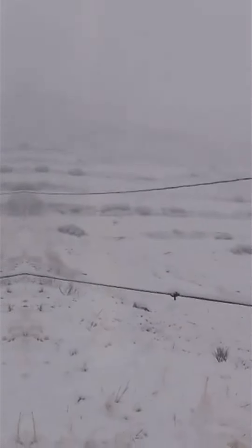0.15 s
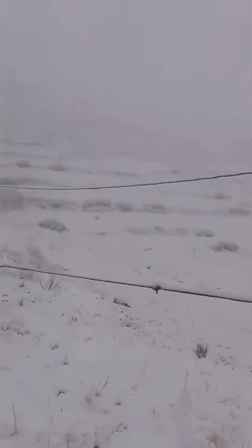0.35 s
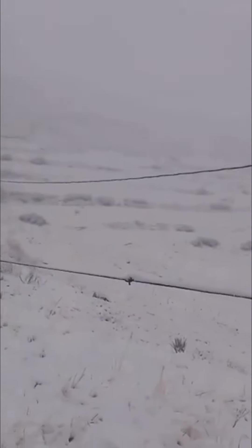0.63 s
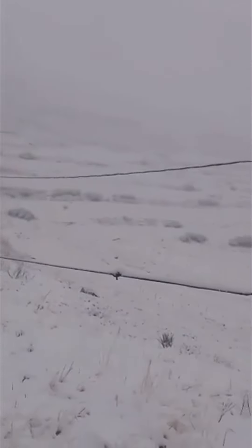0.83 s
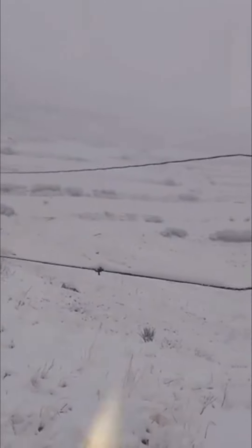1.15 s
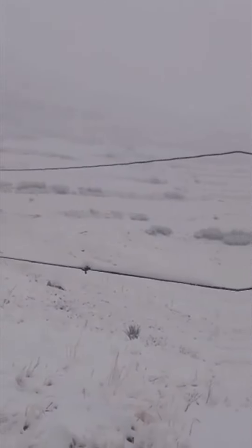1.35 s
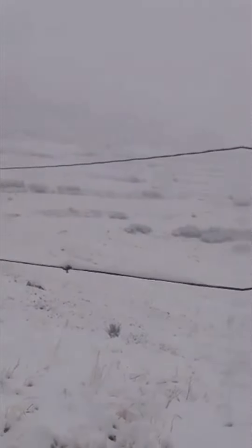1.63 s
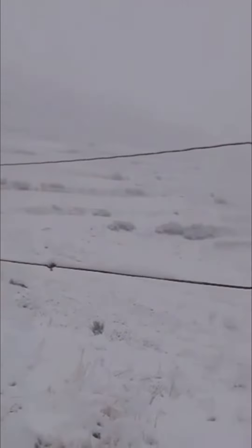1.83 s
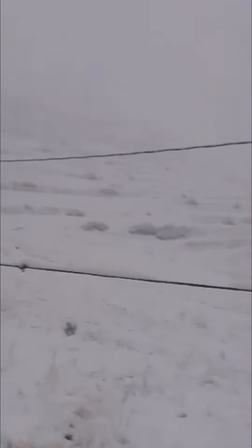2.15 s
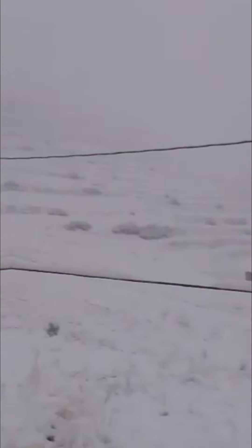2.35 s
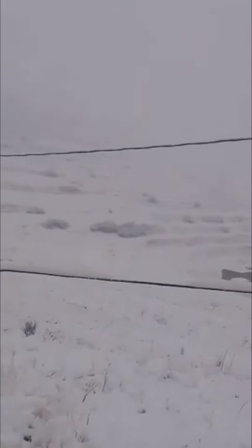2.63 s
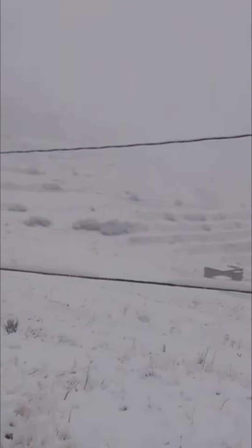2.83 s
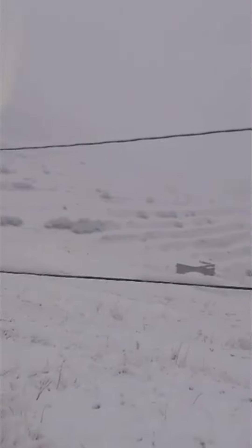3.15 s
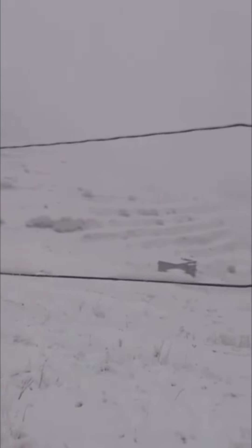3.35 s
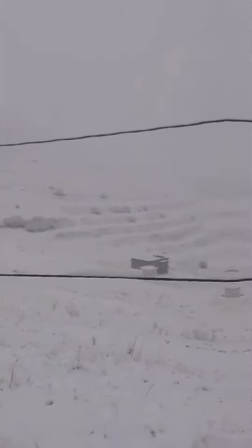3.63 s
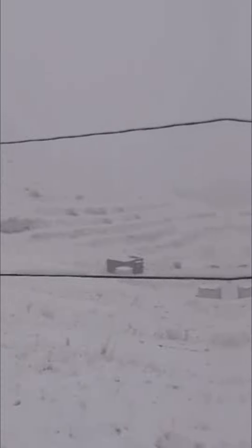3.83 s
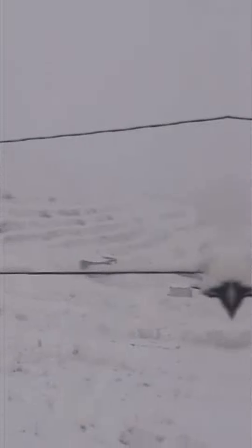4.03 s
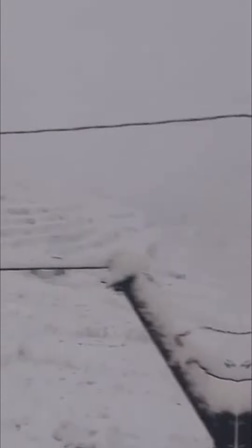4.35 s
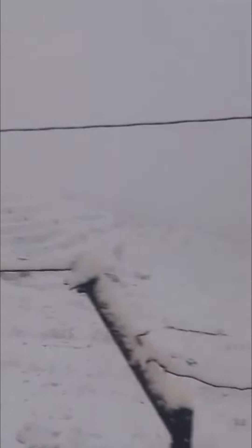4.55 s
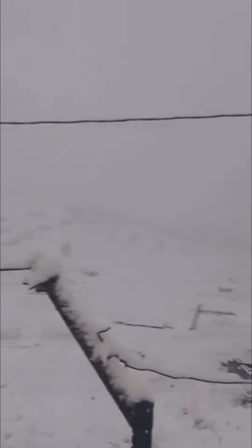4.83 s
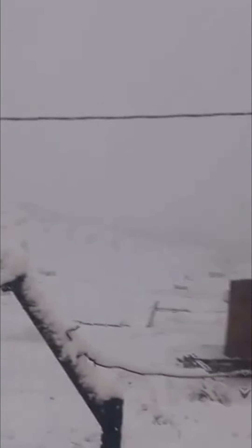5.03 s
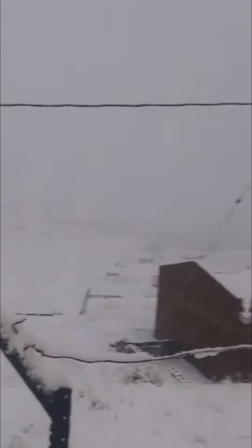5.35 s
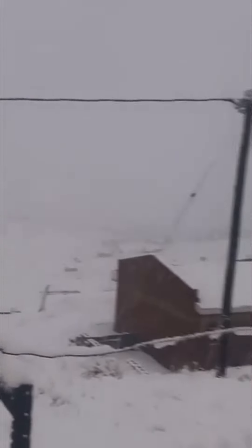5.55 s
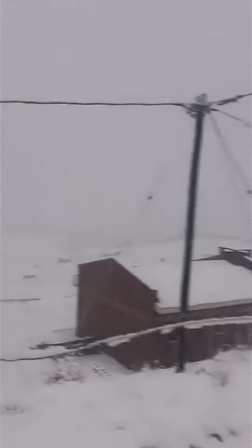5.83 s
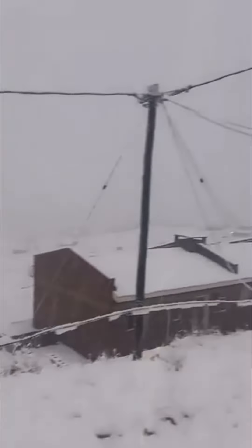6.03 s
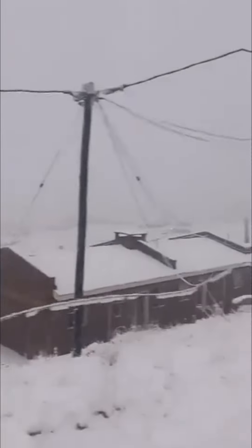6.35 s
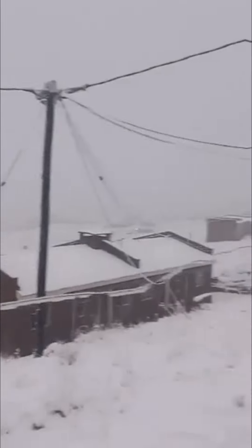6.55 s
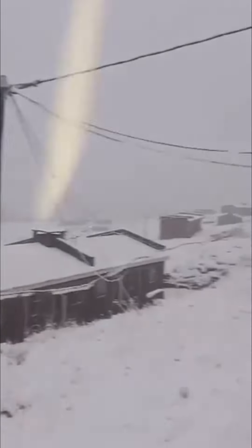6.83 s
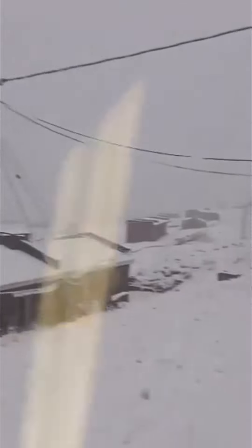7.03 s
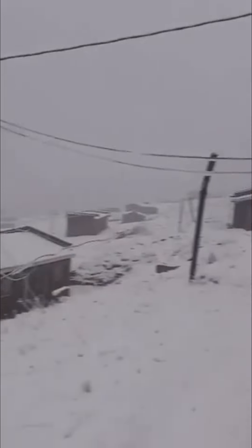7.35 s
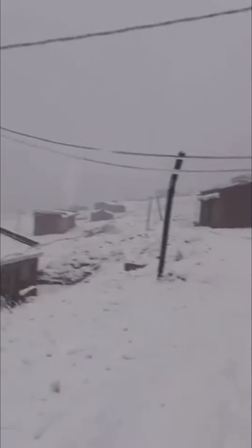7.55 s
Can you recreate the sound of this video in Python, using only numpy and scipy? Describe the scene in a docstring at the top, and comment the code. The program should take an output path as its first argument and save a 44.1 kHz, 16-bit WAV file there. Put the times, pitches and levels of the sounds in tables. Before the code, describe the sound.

Gusty wind buffets a phone microphone outdoors with a low, fluttering rumble, while a few light handling clicks sound.

```python
"""Gusty wind buffeting a hand-held phone above a snowy hillside.
Eddies strike the two microphone ports with rumble and flutter, and the largest heave far below hearing.
Behind them the open air rushes steadily, with a low roar, a hollow whistle and a smooth hiss.
The phone's case clicks now and then in the grip, and fingers brush it faintly.
A few faint, very high ticks sound on top."""
import sys
import numpy as np
from scipy import signal
from scipy.fft import rfft, irfft, next_fast_len
from scipy.io import wavfile
from scipy.ndimage import uniform_filter1d

SR = 44100
rng = np.random.default_rng(int(sys.argv[2]) if len(sys.argv) > 2 else 0)


def bounce(signal):
    """Save signal as a 16-bit WAV file at the path given by the first command-line argument."""
    frames = np.transpose(np.atleast_2d(signal))
    limited = np.clip(frames, -1, 1)
    pcm = np.round(limited * 32767).astype(np.int16)
    wavfile.write(sys.argv[1], SR, pcm)


N = 339433

# strength of the wind at the phone: t/s, level/dB
WIND_AT_PHONE = [(0, -41.5), (0.75, -40.5), (1.0, -38), (1.35, -33), (1.7, -34), (1.9, -33.5), (2.35, -32),
                 (2.8, -36.5), (3.2, -35.5), (3.48, -32.5), (3.62, -37.5), (3.72, -35.5), (3.88, -33.5),
                 (4.03, -38.5), (4.28, -39.5), (4.68, -38), (5.05, -38.5), (5.5, -35), (5.8, -38),
                 (6.05, -34), (6.5, -38), (7.1, -43.5), (7.7, -43)]


def buffeting(rumble_db=8.5, gust_db=10, flutter_db=-0.74, gust_flutter_db=-6, eddy_db=0.22, surge_db=0.3):
    """Eddies strike each port: rumble and flutter ride the wind, and sudden gusts add mostly rumble."""
    # sudden gusts that shove the ports: peak t/s, level/dB, half length/s
    shoves = [(0.69, -34, 0.087), (0.93, -32.5, 0.087), (1.13, -32.5, 0.042), (1.34, -30, 0.056),
              (1.53, -33.5, 0.064), (1.71, -30.5, 0.065), (2.05, -29, 0.093), (2.2, -32, 0.17),
              (2.78, -32, 0.061), (2.93, -32, .04), (3.49, -30, 0.051), (3.74, -26.5, 0.057),
              (3.86, -32, 0.052), (4.67, -34, 0.063), (4.78, -36, 0.036), (5.25, -44, .1),
              (5.66, -42.5, 0.08), (6.0, -32, 0.08), (6.38, -41, 0.034), (7.1, -57, .08),
              (7.37, -50, 0.026)]
    # deep rumble at the ports: f/Hz, level/dB
    rumble_eq = [(3, -13), (7, 9), (14, 5.5), (22, -2.5), (30, 0), (40, -7), (60, -9.5), (90, -32),
                 (200, -33.5)]
    # flutter above the rumble: f/Hz, level/dB
    flutter_eq = [(35, -19), (70, 1.5), (110, -2), (160, -1.5), (260, -3.5), (350, -14.5), (500, -18.5),
                  (900, -31), (2000, -69)]
    wind, gusts = undb(curves(WIND_AT_PHONE)[0]), swells(shoves)
    eddies = undb(eddy_db * np.array([walk(20), walk(20)]))
    rumble_gain = np.hypot(wind * undb(rumble_db + surge_db * walk(7)), gusts * undb(gust_db))
    flutter_gain = np.hypot(wind * undb(flutter_db), gusts * undb(gust_flutter_db))
    rumble = port_noise(rumble_eq, likeness=0.26) * rumble_gain
    flutter = port_noise(flutter_eq, likeness=0.75) * flutter_gain
    return (rumble + flutter) * eddies


def heave(sway_hz=4.1, wander=0.218, rest_db=-27):
    """The largest eddies wrap the whole phone and rock the pressure at both ports alike."""
    # large eddies: peak t/s, level/dB, half length/s
    large_eddies = [(2.43, -13.5, 0.31), (3.2, -6.5, 0.17), (3.47, -5.5, 0.22), (4.72, -21, 0.22),
                    (6.0, -19, 0.046), (6.33, -17, 0.043), (7.1, -23, 0.072)]
    hz = sway_hz * np.exp(wander * walk(3.5))
    sway = np.sqrt(2) * np.sin(2 * np.pi * np.cumsum(hz) / SR)
    return sway * np.hypot(undb(rest_db), swells(large_eddies))


def open_air(roar_db=-41.5, rush_db=-47.0, hiss_db=-55.5, roar_growth=0.54, hiss_growth=1.46):
    """Wind further off: roar, rush, whistle and hiss each swell at their own rate as it freshens."""
    # strength of the wind over the hillside: t/s, level/dB
    hillside_wind = [(0, -44), (1.0, -44.5), (1.95, -44), (2.5, -45.5), (3.3, -45.5), (4.2, -47.5),
                     (4.9, -47.5), (5.45, -46.5), (6.1, -47), (7.7, -48)]
    # low roar: f/Hz, level/dB
    roar_eq = [(90, -10), (200, -11), (270, 1), (400, -0.5), (500, -6), (630, -12.5), (800, -14.5),
               (1200, -32), (2500, -52)]
    # hollow midrange rush: f/Hz, level/dB
    rush_eq = [(500, -8), (720, -5), (830, -3), (920, 4.5), (1010, -0.5), (1110, -1), (1280, -1.5),
               (1480, 0.5), (1650, -6), (2100, -14), (3000, -26.5)]
    # smooth hiss on top: f/Hz, level/dB
    hiss_eq = [(900, -3.5), (1800, 0.5), (2450, 2), (2900, 2.5), (3400, 0), (4200, -4.5), (4700, -5),
               (5600, -10.5), (7000, -24.5), (10000, -31)]
    # how alike the air sounds at the two ports: f/Hz, likeness (clipped to +-0.98)
    port_likeness = [(100, 4.5), (550, 2.5), (700, 0), (870, -0.5), (1000, -0.08), (1150, 1.5), (1500, 0),
                     (2300, 0.33), (2900, -0.37), (4000, 0), (6000, 0), (9000, 3.5)]
    # which port each band favours: f/Hz, left minus right/dB
    port_balance = [(100, 3), (570, -2.5), (800, -2.5), (990, 9), (1300, -7.5), (1740, -2), (2400, 3),
                    (3100, -0.5), (5400, -0.5)]
    far_db, near_db = curves(hillside_wind)[0], curves(WIND_AT_PHONE)[0]
    fresh_db = far_db - np.mean(far_db)
    roar_swell_db = roar_growth * fresh_db + 0.068 * (near_db - np.mean(near_db))
    likeness = along_hz(port_likeness, N)
    roar = port_noise(roar_eq, likeness) * undb(roar_db + roar_swell_db + 0.4 * walk(11))
    rush = port_noise(rush_eq, likeness) * undb(rush_db + fresh_db + 0.5 * walk(9))
    hiss = port_noise(hiss_eq, likeness) * undb(hiss_db + hiss_growth * fresh_db + 0.45 * walk(2.3))
    air = roar + rush + hiss + wind_whistle(fresh_db)
    lean_db = along_hz(port_balance, N) / 2
    return irfft(rfft(air) * undb([lean_db, -lean_db]), N)


def wind_whistle(fresh_db, hz=1010, width_hz=175, level_db=-57, growth=2.4):
    """A hollow whistle of drifting pitch, heard mostly while the wind blows hard."""
    band = [(hz - width_hz, -24), (hz, 0), (hz + width_hz, -24)]
    whistle = wavering(port_noise(band, likeness=0.38), spread_hz=25.02, rate=6)
    return whistle * undb(level_db + growth * fresh_db + 0.84 * walk(6.1))


def case_clicks(snap_db=-2.5, ring_db=-2, tail_db=-6.0, knock_db=-6, slip_s=0.0018, port_lag_s=0.00008):
    """One spot of the case gives way, never quite alike: snap, hollow ring, scattered tail, dull knock."""
    # clicks of the case: t/s, level/dB, left minus right/dB, brightness/(dB per octave)
    clicks = [(0.6915, -23.5, -1, -11), (1.1173, -5, 1, 0.5), (1.2436, -9.5, 1.5, 1),
              (1.2975, -12.5, 1, -3), (1.3525, -11.5, 0, -1), (1.4269, -6, 1.5, 0.5),
              (2.4005, -6, -2.5, 1.5), (2.4546, -23, 1, -5), (2.479, -14.5, 1, -2), (3.281, -24, 1, -2),
              (3.686, -16, 0, -1.5), (4.9364, -7, 0, 0.5), (4.992, -9.5, 0, 0), (5.0058, -18, 2, -1),
              (7.0254, -14, 0, -4.5), (7.1423, -19.5, -2, -7.5), (7.1977, -24.5, -3, -11),
              (7.295, -27.5, -1, -9)]
    # the bright snap: f/Hz, level/dB
    snap_eq = [(600, -17), (1150, -4), (1500, -3.5), (1800, 0.5), (2300, 0), (3000, -1), (3500, 9),
               (3750, -3.5), (4100, -1), (4700, 10.5), (5150, 2), (5600, -8), (6400, -14), (10000, -26)]
    # the snap comes back along fixed paths, which makes it hollow: delay/s, level/dB
    echoes = [(0.0046, -13), (0.0138, -14)]
    # the scatter after the snap: f/Hz, level/dB
    tail_eq = [(600, -9), (1000, -4), (1350, -1), (1750, 4), (2550, 0.5), (3000, -3), (3400, -2),
               (3750, -6.5), (4200, -0.5), (4750, -3), (5100, -4.5), (5600, -17), (10000, -31)]
    # the dull knock of the phone's body: f/Hz, level/dB
    knock_eq = [(200, -5), (330, -3), (480, 2), (620, -12.5), (900, -19)]
    out, size = np.zeros((2, N)), SR // 5
    t, f = np.arange(size) / SR, np.fft.rfftfreq(size, 1 / SR)
    octaves = np.log2(np.clip(f, 1700, 8000) / 3000)
    paths = 1 + sum(undb(db) * np.exp(-2j * np.pi * f * delay) for delay, db in echoes)
    pulse = rfft(impulse(snap_eq, size)) * paths
    # the direct sound reaches one port a moment after the other
    ports = np.exp(-2j * np.pi * f * np.array([[0], [port_lag_s]]))
    for s, db, pan_db, tilt_db in clicks:
        crunch = port_noise([(500, 0), (12000, 0.0082)], likeness=0.83, size=size)
        slips = crunch * np.exp(-(t / slip_s) ** 2)
        snap = unit_energy(irfft(rfft(slips) * pulse, size))
        direct = unit_energy(undb(snap_db) * snap + undb(ring_db) * case_ring(t))
        tail = noise_hit(t, tail_eq, likeness=0.051, rise_s=0.0044, t60=0.17)
        # the heavy body is slow to start moving
        knock = noise_hit(t, knock_eq, likeness=1.0, rise_s=0.0083, t60=0.26)
        spectrum = rfft(direct) * ports + rfft(undb(tail_db) * tail)
        click = irfft(spectrum * undb(tilt_db * octaves), size)
        port_gains = undb(db + np.array([[pan_db], [-pan_db]]) / 2)
        add(out, s, (click + undb(knock_db) * knock) * port_gains)
    return out


def case_ring(t, detune=0.009):
    """The case rings in short modes, each shifted a little by the grip."""
    # modes of the case: f/Hz, level/dB, t60/s, delay until that part is reached/s
    case_modes = [(1710, 1.5, 0.018, 0.0028), (1870, 1, 0.015, 0.0028), (3030, 1.5, 0.0074, 0.00049),
                  (4200, -12, 0.014, 0.02), (4700, 1.5, 0.01, 0.0054), (4770, -13, 0.056, .0005)]
    grip = np.exp(detune * rng.standard_normal(len(case_modes)))
    # neighbours swing against each other, so the ring builds just after the snap
    ring = sum((-1) ** k * mode(t, hz * grip[k], *rest) for k, (hz, *rest) in enumerate(case_modes))
    return unit_energy(ring)


def fingers(grip_db=-63.0, slip_db=1.3, grain_db=1.0):
    """Skin slips on the case in uneven steps: a thin grainy brushing."""
    # fingers sliding on the case: peak t/s, level/dB, half length/s
    slides = [(2.76, -56.5, .14), (3.2, -62, 0.11), (3.7, -65.5, 1), (5.25, -62.5, 0.13), (5.6, -67, 0.58),
              (6.55, -61.5, 0.14)]
    # thin brush of skin: f/Hz, level/dB
    brush_eq = [(2500, -11.5), (5000, -3), (6500, 0), (7800, -2.5), (8700, 0), (9300, -0.5), (10000, 0.5)]
    brush = port_noise(brush_eq, likeness=0.51) * np.hypot(undb(grip_db), swells(slides))
    return brush * undb(slip_db * walk(10) + grain_db * walk(78))


def high_ticks(t60=0.084):
    """Faint, very high ticks, most of them narrow: bands of noise that die fast."""
    # ticks: t/s, level/dB, f/Hz, width/Hz
    ticks = [(3.013, -51, 9640, 500), (5.55, -48, 9700, 500), (5.572, -48, 6960, 5000),
             (5.752, -52, 6650, 2500), (5.773, -47.5, 8900, 3500), (6.183, -56, 9450, 600),
             (6.3, -51, 9700, 500)]
    out, t = np.zeros((2, N)), np.arange(SR // 10) / SR
    for s, db, hz, width_hz in ticks:
        band = [(hz - width_hz, -14), (hz, 0), (hz + width_hz, -14)]
        add(out, s, port_noise(band, likeness=0.23, size=len(t)) * fade(t, t60) * undb(db))
    return out


def mic_hiss(level_db=-67.0):
    """The microphones' own faint noise lies under everything."""
    # noise floor: f/Hz, level/dB
    floor_eq = [(1000, 1), (5000, -1), (6500, 4), (8000, -3), (9700, -12), (12000, 1.5)]
    return port_noise(floor_eq, likeness=1.0) * undb(level_db)


def undb(db):
    """Decibels to gain."""
    return 10 ** (np.asarray(db) / 20)


def unit(x):
    """Scale to an rms of one."""
    return x / np.sqrt(np.mean(x ** 2))


def unit_energy(x):
    """Scale a short sound to a mean energy of one per port."""
    return unit(x) / np.sqrt(x.shape[-1])


def curves(table):
    """Each column of a table, joined by straight lines in time."""
    s, *columns = np.transpose(table)
    return [np.interp(np.arange(N) / SR, s, c) for c in columns]


def swells(table):
    """Gain of a set of swells: each rises and falls as a bell, and their powers add."""
    t = np.arange(N) / SR
    return np.sqrt(sum((undb(db) * np.exp(-((t - s) / half_s) ** 2)) ** 2 for s, db, half_s in table))


def walk(rate):
    """Random levels held 1 / rate s and slewed twice; rms one."""
    hold = max(int(SR / rate), 2)
    held = np.repeat(rng.standard_normal(N // hold + 1), hold)
    return unit(uniform_filter1d(uniform_filter1d(held, hold), hold)[:N])


def fade(t, t60):
    """Exponential decay, 60 dB down at t60."""
    return np.exp(-np.log(1000) * t / t60)


def along_hz(points, size):
    """A table of f/Hz, value read at every frequency of a spectrum."""
    hz, value = np.transpose(points)
    return np.interp(np.log(np.fft.rfftfreq(size, 1 / SR) + 1e-6), np.log(hz), value)


def colour(x, eq):
    """Filter by an EQ curve, rolling off beyond its ends."""
    size = x.shape[-1]
    f = np.fft.rfftfreq(size, 1 / SR)
    rolloff = np.minimum(f / eq[0][0], 1) ** 2 / np.maximum(f / eq[-1][0], 1) ** 2
    return irfft(rfft(x) * undb(along_hz(eq, size)) * rolloff, size)


def port_noise(eq, likeness, size=N):
    """Coloured noise at two ports, partly shared between them."""
    mid, side = rfft(rng.standard_normal((2, size)))
    likeness = np.clip(likeness, -.98, .98)
    mid, side = mid * np.sqrt(1 + likeness), side * np.sqrt(1 - likeness)
    return unit(colour(irfft(np.array([mid + side, mid - side]), size), eq))


def noise_hit(t, eq, likeness, rise_s, t60):
    """A burst of coloured noise with a soft attack and an exponential decay."""
    envelope = (1 - np.exp(-t / rise_s)) * fade(t, t60)
    return unit_energy(port_noise(eq, likeness, len(t)) * envelope)


def impulse(eq, size):
    """The most abrupt pulse that has a given colour (minimum phase)."""
    cepstrum = irfft(np.log(undb(along_hz(eq, size))), size)
    cepstrum[1:size // 2] *= 2
    cepstrum[size // 2 + 1:] = 0
    return irfft(np.exp(rfft(cepstrum)), size)


def mode(t, hz, db, t60, delay):
    """One decaying resonance that starts after a delay."""
    age = np.maximum(t - abs(delay), 0)
    return undb(db) * fade(age, t60) * np.sin(2 * np.pi * hz * age)


def wavering(x, spread_hz, rate):
    """Let the pitch of a narrow band drift up and down."""
    turn = np.exp(2j * np.pi * np.cumsum(spread_hz * walk(rate)) / SR)
    return np.real(signal.hilbert(x, next_fast_len(N))[:, :N] * turn)


def add(out, s, sound):
    """Mix a stereo sound in at time s."""
    i = int(s * SR)
    out[:, i:i + sound.shape[1]] += sound[:, :N - i]


def scene():
    """Wind up front; handling, high ticks and a faint noise floor behind it."""
    return mic_hiss() + buffeting() + heave() + open_air() + case_clicks() + fingers() + high_ticks()


def record(dry):
    """The phone cuts the top steeply."""
    top_hz = 9950
    return signal.sosfilt(signal.ellip(12, .2, 50, top_hz, fs=SR, output="sos"), dry)


dry = scene()
out = record(dry)
bounce(out)
```